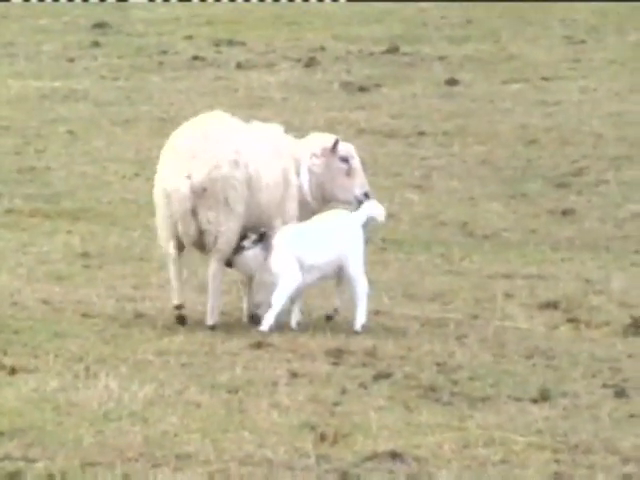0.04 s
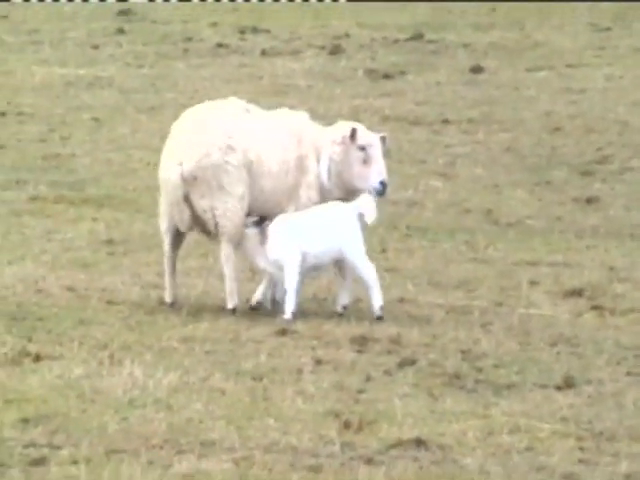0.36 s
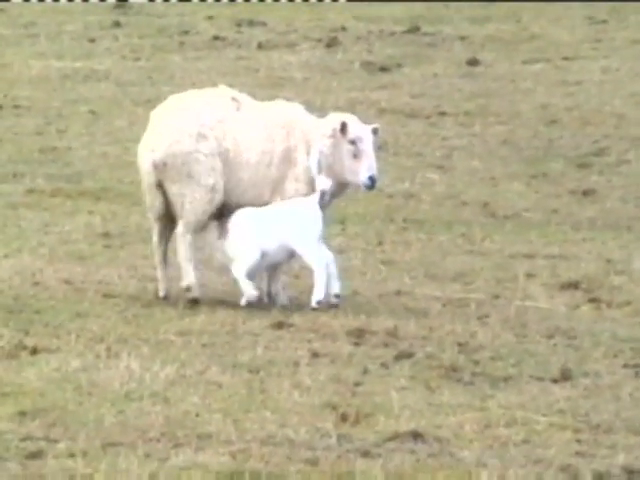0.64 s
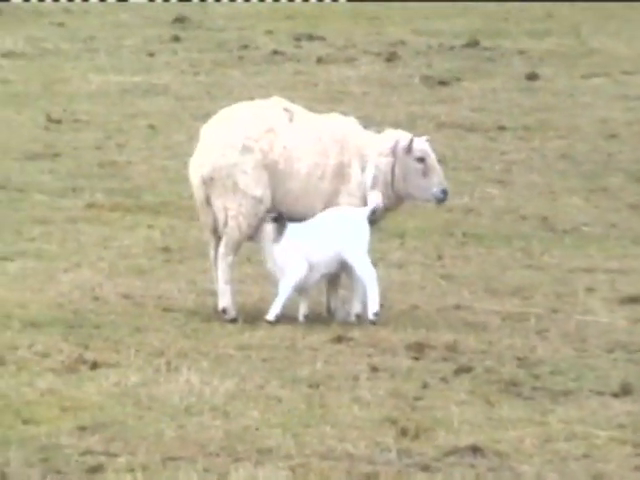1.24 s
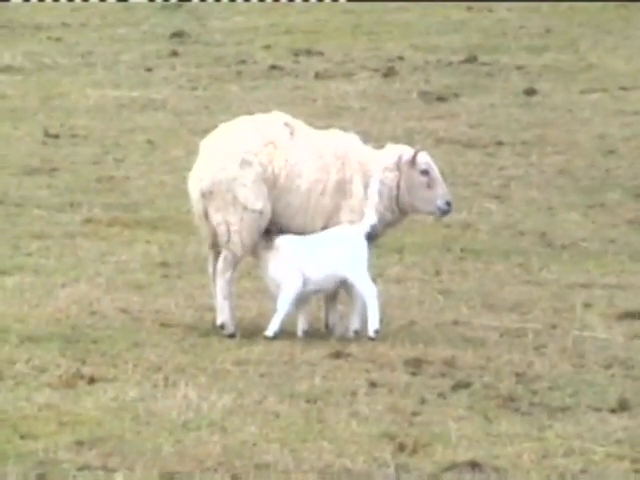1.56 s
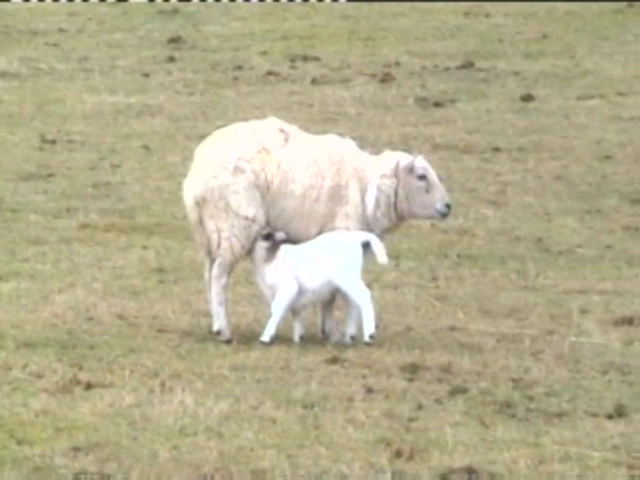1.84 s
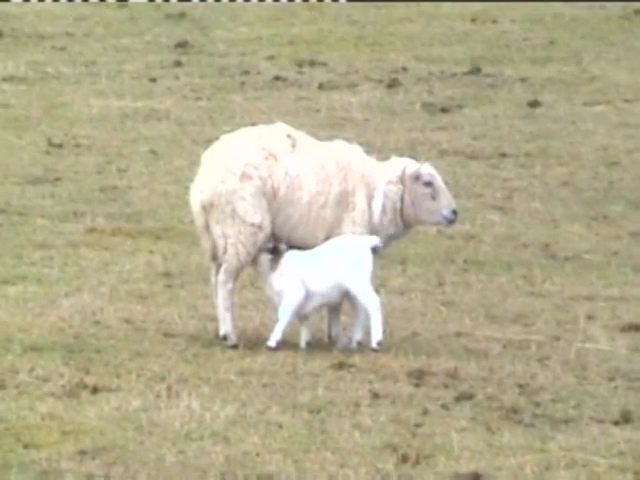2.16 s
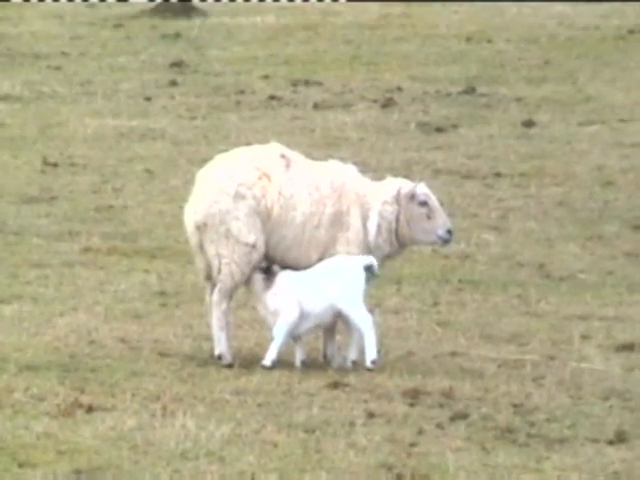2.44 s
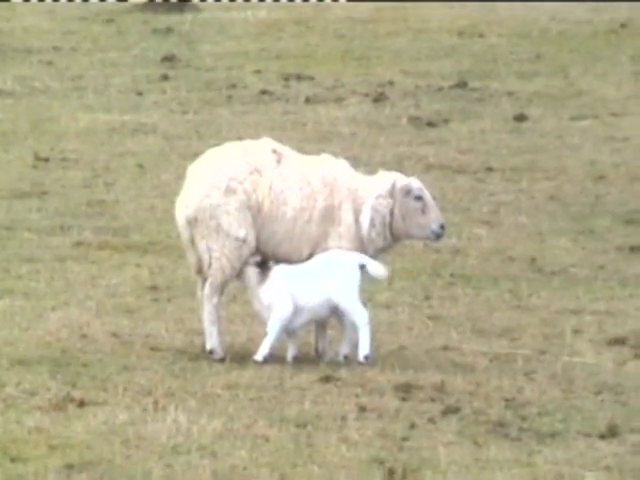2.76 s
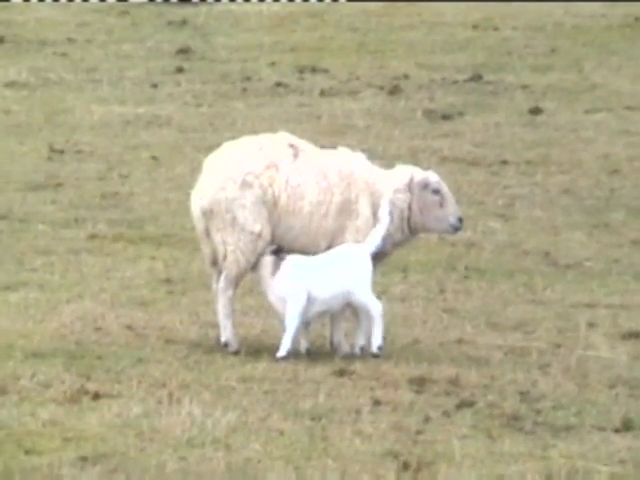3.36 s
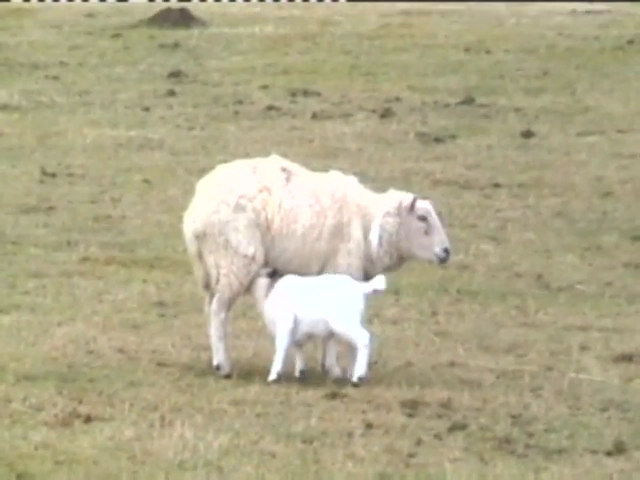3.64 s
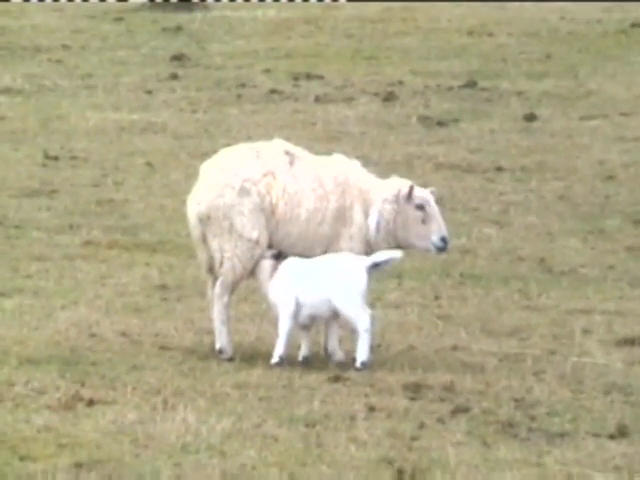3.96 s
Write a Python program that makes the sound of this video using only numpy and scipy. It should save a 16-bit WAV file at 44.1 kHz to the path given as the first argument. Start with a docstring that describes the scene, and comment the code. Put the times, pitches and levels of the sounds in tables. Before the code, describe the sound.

A sheep bleats once, loudly, then faint distant traffic and hiss carry on.

```python
"""An open field, a stereo camera microphone, a ewe nearby and a little to the right. She opens with one
buzzy bleat, vocal pulses ringing her throat, and shuts her mouth at 0.6 s; the far side of the field
answers faintly. Two small ticks sound close by, one during the bleat and one after. Just past 1 s a far
bird gives one falling trill. Soft handling bumps come thickest near 2.4 s, and the case rings on.
Distant traffic and the camera's own thin motor whine and hiss run underneath from start to end."""
import sys
import numpy as np
from scipy import signal
from scipy.fft import rfft, irfft, next_fast_len
from scipy.io import wavfile
from scipy.ndimage import map_coordinates

SR = 44100
rng = np.random.default_rng(int(sys.argv[2]) if len(sys.argv) > 2 else 0)


def dump_mix(stems):
    """Bounce the given channels to the path in sys.argv[1] as a 16-bit WAV at rate SR."""
    frames = np.atleast_2d(stems).T  # one column per channel
    limited = np.clip(frames, -1, 1)  # hard clip at full scale
    pcm = np.round(limited * 32767).astype(np.int16)
    wavfile.write(sys.argv[1], SR, pcm)


N = 176400


def amp(db):
    """Decibels to gain."""
    return 10 ** (np.asarray(db) / 20)


def unit(x):
    """Scale to rms 1."""
    return x / np.sqrt(np.mean(x ** 2) + 1e-20)


def clock():
    """Seconds at each sample."""
    return np.arange(N) / SR


def grid():
    """Frequencies in Hz at which filter responses are given."""
    return np.fft.rfftfreq(2 * next_fast_len(N * 2 // 3), 1 / SR)


def along(points):
    """Frequency response through (Hz, dB) points on a log axis."""
    hz, db = np.transpose(points)
    return amp(np.interp(np.log(grid() + 1), np.log(hz + 1), db))


def curves(rows):
    """One value per sample for each column after the time."""
    seconds, *columns = np.transpose(rows)
    return [np.interp(clock(), seconds, column) for column in columns]


def wobble(rate):
    """A smooth random curve, rate knots a second."""
    return map_coordinates(rng.standard_normal(int(N * rate / SR) + 4), [clock() * rate])


def filtered(x, response):
    """Pass x through a frequency response."""
    return irfft(rfft(x, 2 * len(response) - 2) * response)[..., :N]


def rush(colour, alike):
    """Coloured stereo noise of rms 1; alike is the left-right correlation."""
    mid, side = filtered(rng.standard_normal((2, N)), along(colour))
    turn = np.arccos(alike) / 2
    return unit(np.cos(turn) * mid + np.sin(turn) * np.array([side, -side]))


def pulses(times, sizes):
    """Clicks placed between samples with a windowed sinc."""
    at = times[:, None] * SR
    taps = np.floor(at).astype(int) + np.arange(-7, 9)
    shape = np.sinc(taps - at) * np.cos(np.pi * (taps - at) / 16) ** 2
    return np.bincount(np.clip(taps, 0, N).ravel(), (sizes[:, None] * shape).ravel(), N + 1)[:N]


def traffic():
    """Tyre roar from a distant road, swelling and sinking."""
    # The road's swell. Each row: time in seconds, relative level in dB.
    swell = [(0.78, -52), (1.12, -50.5), (1.21, -48.5), (1.45, -51.5), (2.13, -49.5), (2.38, -52),
             (2.39, -52), (2.43, -51), (2.64, -53.5), (3.0, -51.5), (3.07, -53), (3.79, -54), (3.87, -55),
             (3.95, -53)]
    # The roar's spectrum. Each row: frequency in Hz, gain in dB.
    colour = [(30, -20), (70, -32), (130, -31), (260, -14), (420, -11), (600, -7.5), (880, -5.5),
              (990, 1.5), (1060, -5), (1280, -5.5), (1550, -12), (2100, -19.5), (3200, -25.5),
              (7000, -61.5)]
    db, = curves(swell)
    return amp(db + 0.5 + 0.66 * wobble(14)) * rush(colour, alike=0.77)


def camera_motor():
    """The motor's slightly unsteady whine reaches the two microphone ports out of step, over hiss."""
    # Motor tones. Each row: frequency in Hz, mean dB common to both ports, mean dB opposed between them.
    whine = [(2218, -75, -80), (3015, -75, -80), (3112, -70, -76), (3478, -74, -75), (3548, -76, -83),
             (3779, -73, -75), (4000, -70, -76), (4021, -77, -82), (4054, -69, -76), (4097, -79, -81),
             (4409, -78, -86), (4447, -75, -79), (4544, -81, -78), (4635, -68, -80), (4770, -79, -79),
             (4877, -77, -75), (5335, -75, -73), (5362, -77, -74), (5663, -77, -73), (5776, -78, -72),
             (5803, -73, -70), (5873, -75, -74), (6223, -90, -77), (6379, -76, -67)]
    # The hiss spectrum. Each row: frequency in Hz, gain in dB.
    hiss_colour = [(100, -30.5), (1000, 7), (2500, -0.5), (4500, -0.5), (6300, -3), (7300, -9), (8000, -26)]
    drift_rad, flutter_db = 0.4, 1.4
    t, common, opposed = clock(), np.zeros(N), np.zeros(N)
    for hz, common_db, opposed_db in whine:
        phase = 2 * np.pi * hz * t + drift_rad * wobble(20)
        gain = np.sqrt(2) * amp(flutter_db * wobble(20))
        common += gain * amp(common_db) * np.sin(phase)
        opposed += gain * amp(opposed_db) * np.cos(phase)
    hiss = amp(-55.5) * rush(hiss_colour, alike=0.18)
    return common + np.array([opposed, -opposed]) + hiss


def handling():
    """A hand rubs and bumps the case, right at the microphone; the case rings faintly once it rests."""
    # Bumps. Each row: centre in seconds, width in seconds, relative level in dB, thud pitch in Hz.
    bumps = [(0.159, 0.011, -53, 280), (0.954, 0.01, -59, 280), (1.66, 0.013, -60, 200),
             (2.21, 0.034, -56.5, 180), (2.252, 0.015, -48, 307), (2.341, 0.0096, -39.5, 240),
             (2.374, 0.011, -37.5, 348), (2.397, 0.0055, -38.5, 209), (2.413, 0.0063, -38.5, 264)]
    # The rub's spectrum. Each row: frequency in Hz, gain in dB.
    rub_colour = [(25, -46), (70, -3.5), (140, -4.5), (300, 7.5), (450, 1), (800, -11), (2000, -48)]
    rest_s, case_hz, case_t60_s = 2.42, 297, 2.8
    t = clock()
    rested = np.maximum(t - rest_s, 0)
    rub_level = amp(-57.5) * np.exp(-rested / 0.016)
    thuds = np.zeros(N)
    for centre, width, db, hz in bumps:
        push = amp(db) * np.exp(-((t - centre) / width) ** 2)
        rub_level += push
        thuds += amp(-10.5) * push * np.sin(2 * np.pi * hz * (t - centre))
    common, opposed = rub_level * unit(filtered(rng.standard_normal((2, N)), along(rub_colour)))
    opposed += amp(-61 - 60 * rested / case_t60_s) * np.sin(2 * np.pi * case_hz * rested)
    # The case shakes the two ports mostly in opposition.
    return thuds + amp(-16.5) * common + np.array([opposed, -opposed])


def ticks(width_s=0.002):
    """Two small, dry, bright ticks close to the microphone."""
    # Ticks. Each row: centre in seconds, level in dB.
    bursts = [(0.101, -46), (0.708, -53)]
    # Their spectrum. Each row: frequency in Hz, gain in dB.
    colour = [(2500, -24), (3600, -6), (4100, 0), (4700, -6), (7000, -22)]
    level = sum(amp(db) * np.exp(-((clock() - centre) / width_s) ** 2) for centre, db in bursts)
    return level * rush(colour, alike=0.18)


def bird(trill_hz=55, depth_hz=121):
    """A far bird's whistle, quavering fast as it falls."""
    # The call. Each row: time in seconds, centre pitch in Hz, level in dB.
    call = [(1.15, 2550, -70), (1.169, 2760, -49), (1.19, 2560, -55), (1.23, 2460, -60), (1.29, 2460, -57),
            (1.37, 2420, -64), (1.45, 2450, -64), (1.5, 2400, -80)]
    start_s, peak_s, end_s = call[0][0], call[1][0], call[-1][0]
    t = clock()
    hz, db = curves(call)
    quaver = np.cos(2 * np.pi * trill_hz * (t - peak_s))
    cycles = np.cumsum(hz + depth_hz * quaver) / SR
    return amp(db) * np.sin(2 * np.pi * cycles) * (t > start_s) * (t < end_s)


def field(x, t60_s=0.82, dark_hz=2200):
    """A thin, dull scatter comes back to the microphone from the ground and hedges."""
    mid, side = rng.standard_normal((2, SR)) * amp(-60 * clock()[:SR] / t60_s)
    tail = (mid + 0.5 * np.array([side, -side])) / np.linalg.norm(mid)
    scatter = signal.fftconvolve(x[None], tail, axes=1)[:, :N]
    return filtered(scatter, 1 / (1 + 1j * grid() / dark_hz))


def throat(formants, slope, scale):
    """The throat's causal response: resonances, their frequencies times scale, on a spectral slope."""
    power = sum(amp(db) ** 2 / (1 + (2 * (grid() - hz * scale) / width) ** 2)
                for hz, width, db in formants)
    cepstrum = irfft(np.log(np.sqrt(power) * along(slope)))
    half = len(cepstrum) // 2
    return np.exp(rfft(np.r_[cepstrum[0], 2 * cepstrum[1:half], np.zeros(half)]))  # minimum phase


def vocal_folds(close_s, stop_s):
    """Sharp, even pulses, each with a puff of rasp; they loosen and sag as the bleat ends."""
    # The bleat's melody ahead of the sag. Each row: time in seconds, pitch in Hz.
    melody = [(0, 144.3), (0.065, 142.9), (0.09, 141.3), (0.155, 143.9), (0.185, 141.4), (0.215, 142.7),
              (0.243, 139.6), (0.295, 140.7), (0.345, 138.7), (0.435, 142.1), (0.478, 142.2),
              (0.495, 145.7), (0.508, 144.0), (0.532, 137.1), (0.572, 138.6), (0.605, 136.0), (0.62, 131.2)]
    sag_hz_per_s, rough_from_s, shimmer_db = 350, 0.595, 0.4
    spread_hz, spread_width_hz = 2800, 2100
    t = clock()
    pitch, = curves(melody)
    sag = sag_hz_per_s * np.maximum(t - close_s, 0)
    cycles = np.cumsum(np.maximum(pitch - sag, pitch / 2)) / SR - 0.12
    times = np.interp(np.arange(int(cycles[SR])), cycles, t)
    slip, shimmer = rng.standard_normal((len(times), 2)).T
    jitter_s = np.interp(times, [rough_from_s, stop_s], [8e-6, 120e-6])
    buzz = pulses(times + jitter_s * slip, amp(shimmer_db * shimmer))
    rasp = unit(rng.standard_normal(N) * np.exp(-2.6 * (cycles % 1)))
    # An all-pass smears each pulse's crest a little around spread_hz.
    pole = spread_hz ** 2 - grid() ** 2 + 1j * grid() * spread_width_hz
    return filtered(buzz / buzz[:SR].std(), np.conj(pole) / pole) + amp(-24) * rasp


def last_flap(start_s=0.647, rise_s=0.0043, hz=640):
    """One slack flap of the folds ends the call."""
    age = np.maximum(clock() - start_s, 0)
    swell = age / rise_s
    return amp(-36) * swell * np.exp(1 - swell) * np.sin(2 * np.pi * hz * age)


def ewe():
    """The folds ring her throat; the upper formants vanish as the mouth shuts, the voice just after."""
    # Her effort. Each row: time in seconds, relative dB of the first formant, then of the upper ones.
    effort = [(0.0, -34, -29), (0.028, -37.5, -30.5), (0.308, -36, -33.5), (0.39, -37.5, -32.5),
              (0.516, -34.5, -32.5), (0.54, -37.5, -32.5), (0.61, -35, -35.5)]
    # Throat resonances. Each row: centre in Hz, width in Hz, relative level in dB.
    first_formant = [(706, 82, 0)]
    upper_formants = [(1704, 78, -0.5), (1960, 250, -10.5), (2653, 222, -0.5), (3244, 230, -4.5),
                      (4760, 240, -22.5), (6500, 600, -15.5)]
    # Slopes around the first and the upper formants. Each row: frequency in Hz, gain in dB.
    low_slope = [(140, -18), (285, -5.5), (430, -4.5), (570, 0.5), (850, -2), (1000, -5.5), (1200, -14.5),
                 (2000, -24.5), (4000, -66.5)]
    high_slope = [(300, -35), (900, -17), (1300, 0), (1600, 1.5), (3280, 1.5), (3450, -11.5), (3750, -2),
                  (4250, -9.5), (4900, -1.5), (6300, -10), (7500, -41)]
    close_s, close_db_per_s = 0.617, 1697
    stop_s, stop_db_per_s = 0.627, 1499
    formant_fall = 0.0096  # share by which the resonances drop as the mouth narrows
    t = clock()
    source = vocal_folds(close_s, stop_s)
    low_db, high_db = curves(effort)
    low_db += 1.5 - stop_db_per_s * np.maximum(t - stop_s, 0)
    high_db += 0.5 - close_db_per_s * np.maximum(t - close_s, 0)
    narrowing = np.minimum(t / close_s, 1)
    voice = np.zeros(N)
    for formants, slope, db in [(first_formant, low_slope, low_db), (upper_formants, high_slope, high_db)]:
        for scale, share in [(1 + formant_fall / 2, 1 - narrowing), (1 - formant_fall / 2, narrowing)]:
            tract = throat(formants, slope, scale)
            steady_rms = filtered(source, tract)[:SR // 2].std()
            voice += filtered(source * share * amp(db), tract) / steady_rms
    return voice + last_flap()


def arrival(x, db, delay_s):
    """Sound reaching the microphone by one path, with that path's gain and delay."""
    return filtered(x, amp(db) * np.exp(-2j * np.pi * grid() * delay_s))


def scene(right_louder_db=4, right_lead_s=45e-6):
    """The ewe stands a little right of the microphone; everything else surrounds her."""
    voice, trill = ewe(), bird()
    direct = np.array([arrival(voice, side * right_louder_db, -side * right_lead_s)
                       for side in (-0.5, 0.5)])
    echo = arrival(voice, db=-18.5, delay_s=0.087)  # one reflection from across the field
    scatter = amp(-17) * field(voice + trill)
    return direct + echo + trill + scatter + traffic() + camera_motor() + handling() + ticks()


def record(dry, top_hz=8050):
    """The camera keeps nothing above its band limit."""
    return filtered(dry, 1.0 * (grid() < top_hz))


dry = scene()
out = record(dry)
dump_mix(out)
```